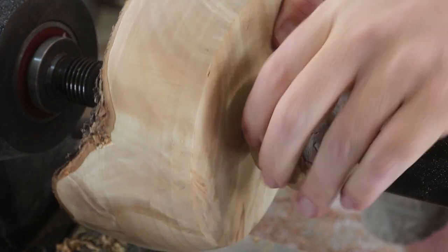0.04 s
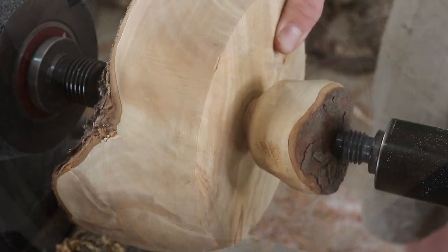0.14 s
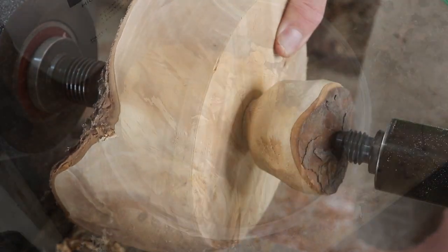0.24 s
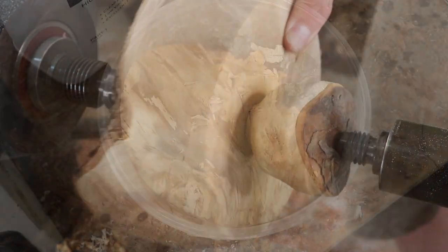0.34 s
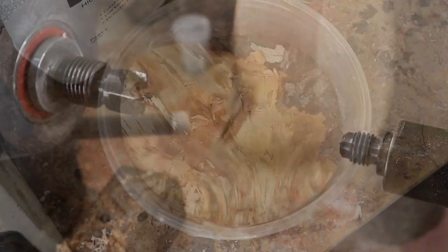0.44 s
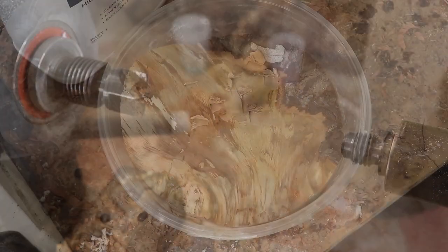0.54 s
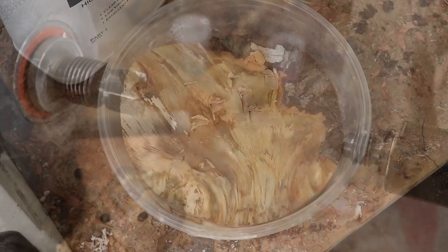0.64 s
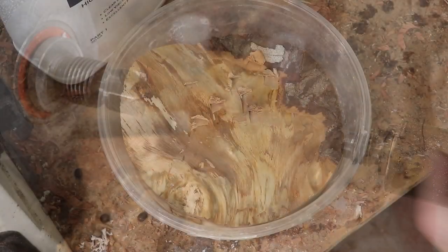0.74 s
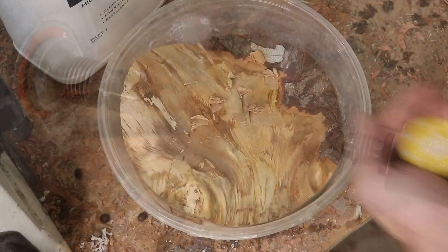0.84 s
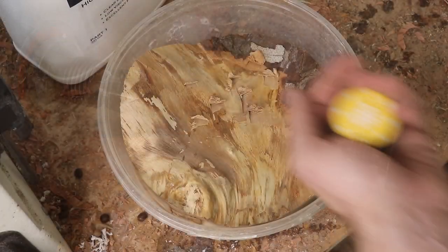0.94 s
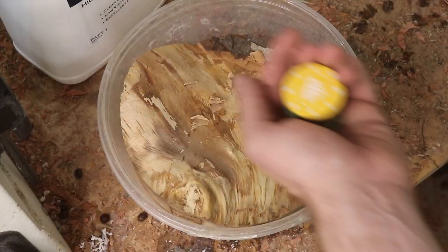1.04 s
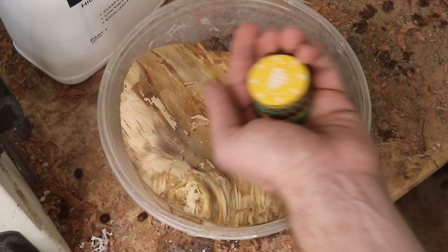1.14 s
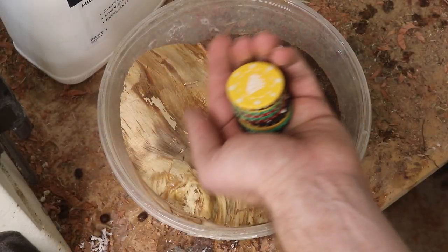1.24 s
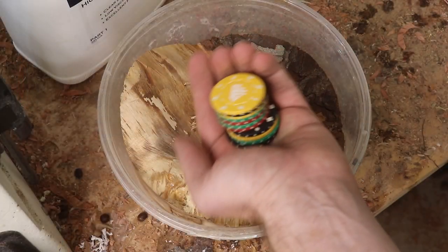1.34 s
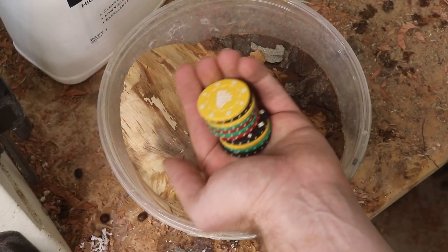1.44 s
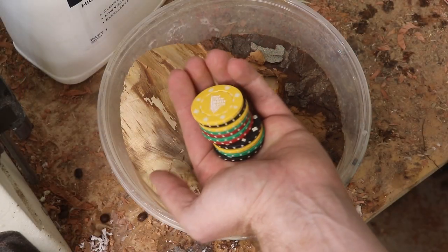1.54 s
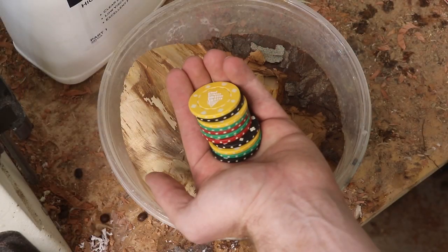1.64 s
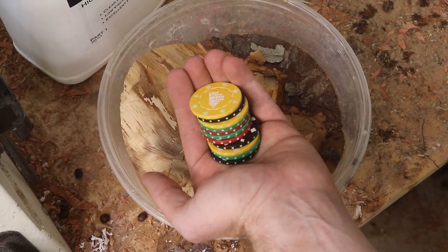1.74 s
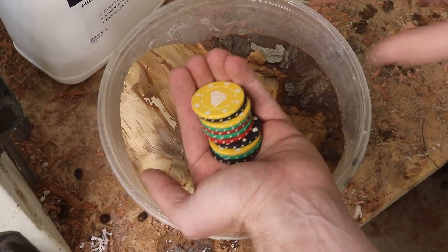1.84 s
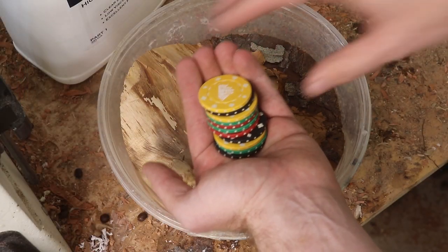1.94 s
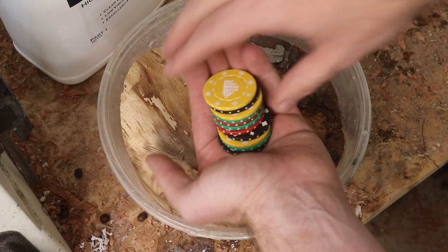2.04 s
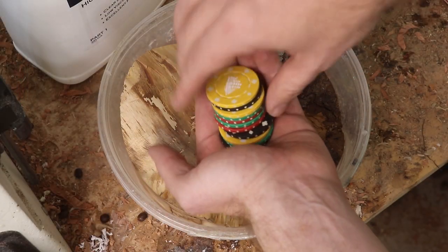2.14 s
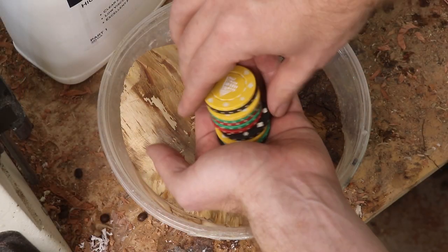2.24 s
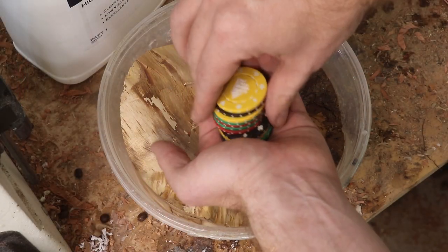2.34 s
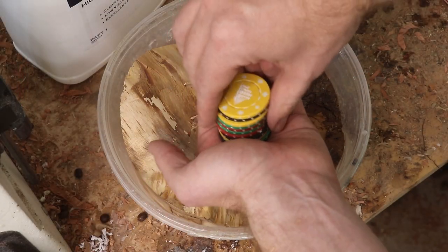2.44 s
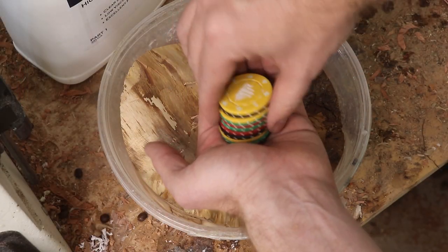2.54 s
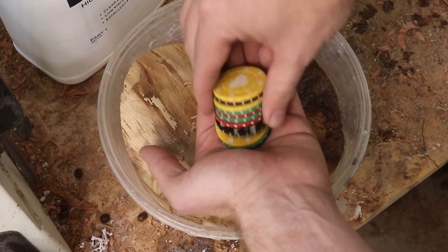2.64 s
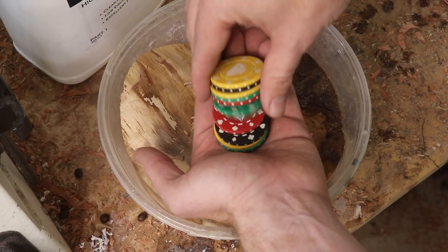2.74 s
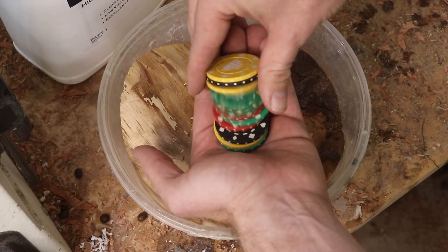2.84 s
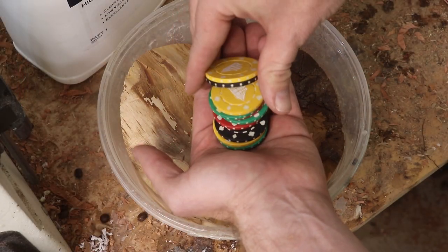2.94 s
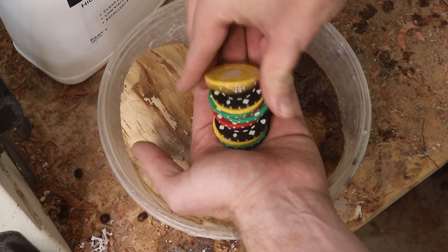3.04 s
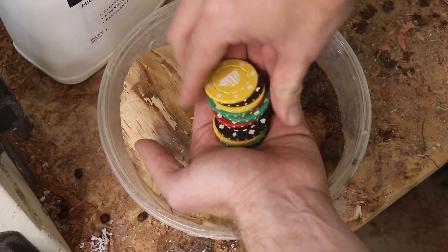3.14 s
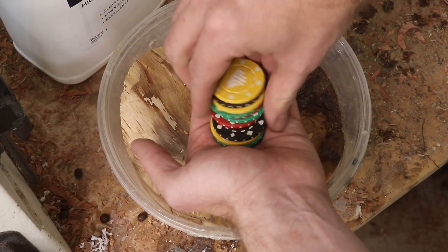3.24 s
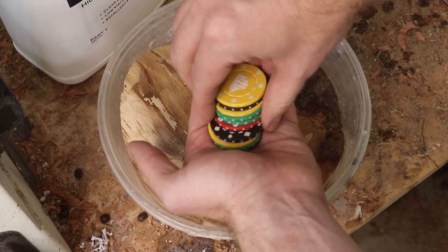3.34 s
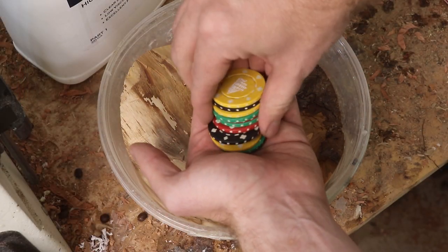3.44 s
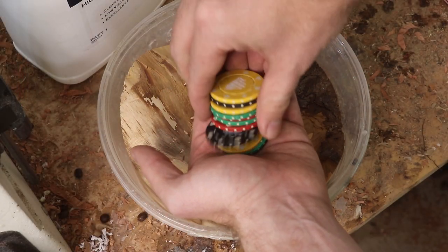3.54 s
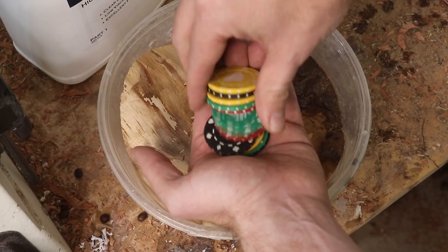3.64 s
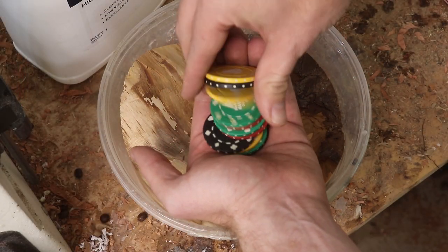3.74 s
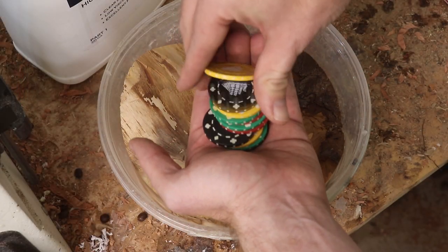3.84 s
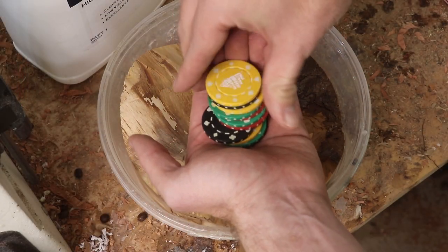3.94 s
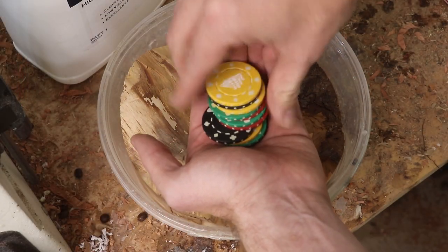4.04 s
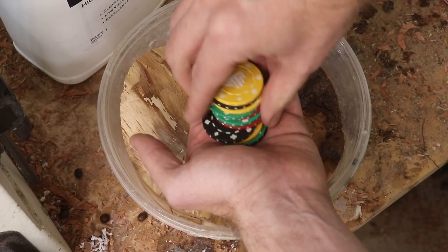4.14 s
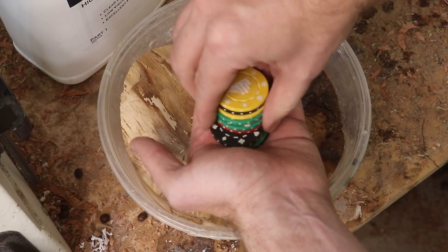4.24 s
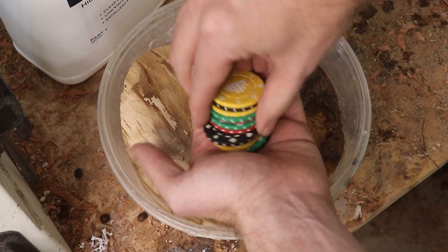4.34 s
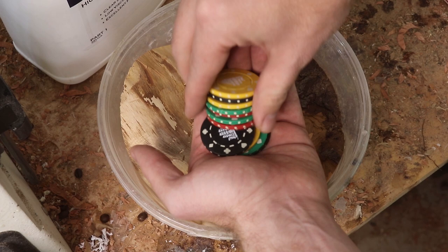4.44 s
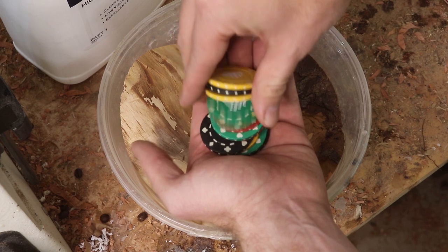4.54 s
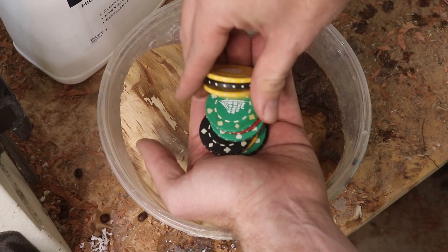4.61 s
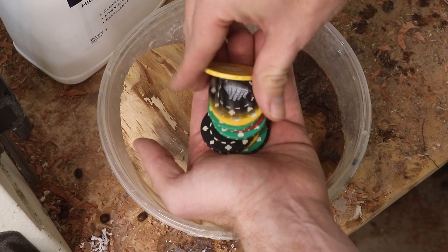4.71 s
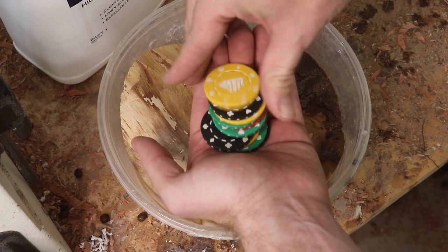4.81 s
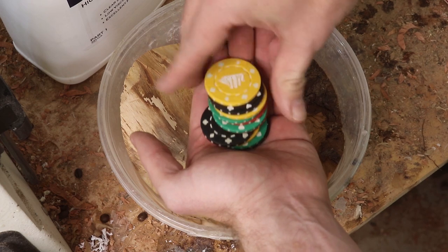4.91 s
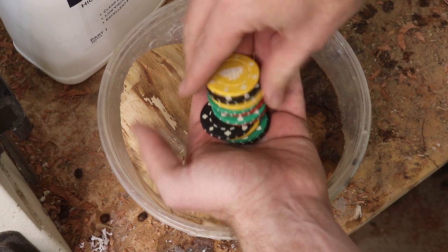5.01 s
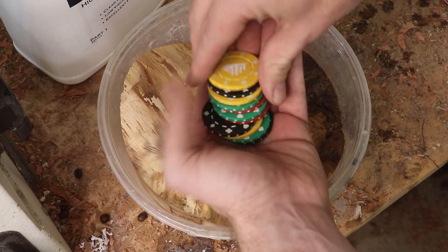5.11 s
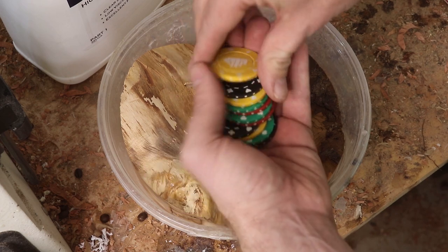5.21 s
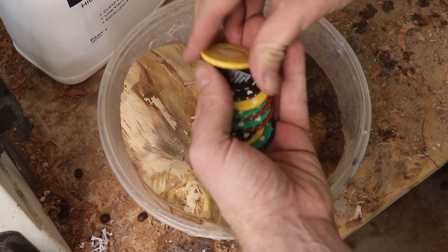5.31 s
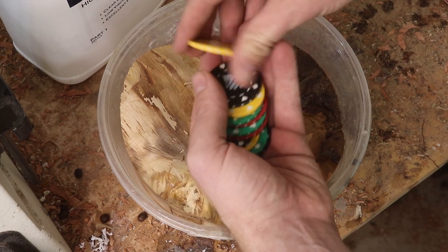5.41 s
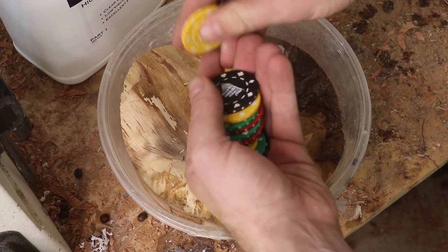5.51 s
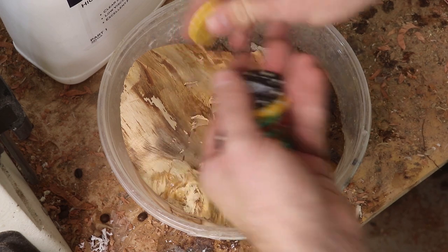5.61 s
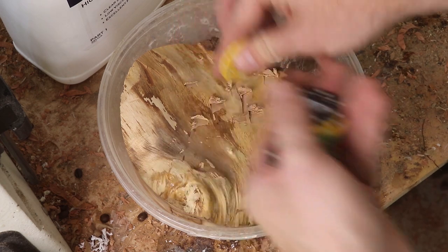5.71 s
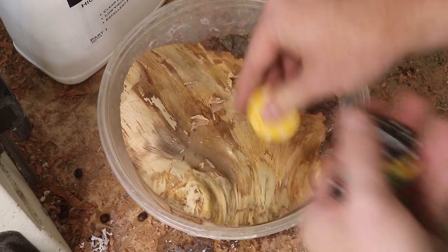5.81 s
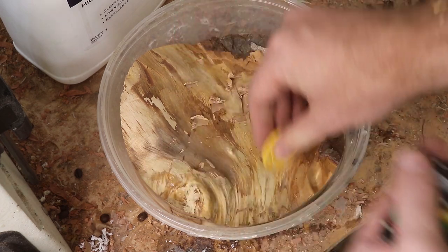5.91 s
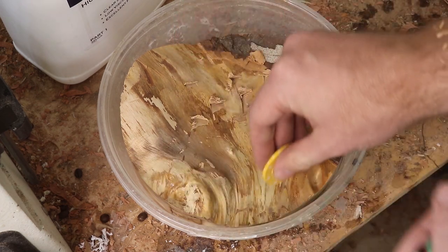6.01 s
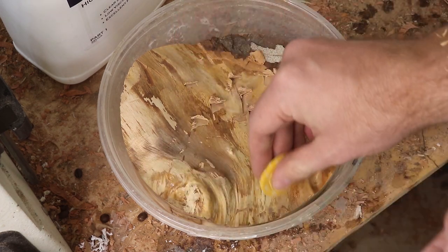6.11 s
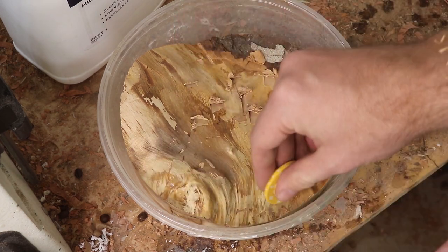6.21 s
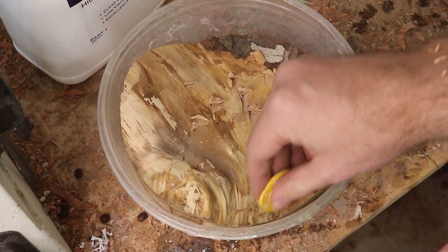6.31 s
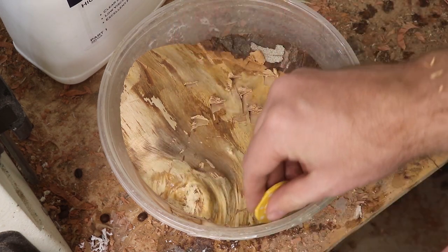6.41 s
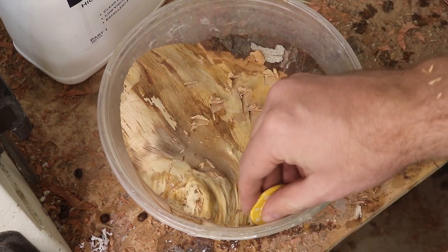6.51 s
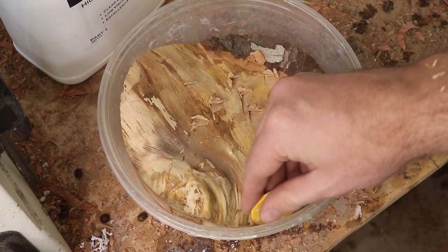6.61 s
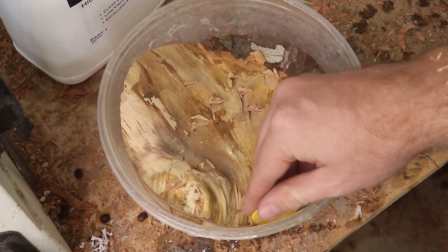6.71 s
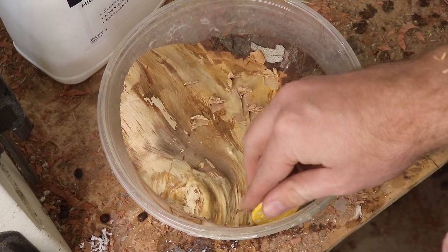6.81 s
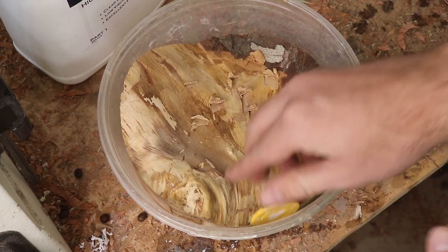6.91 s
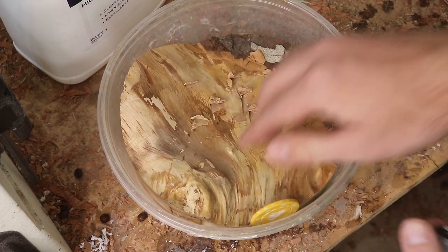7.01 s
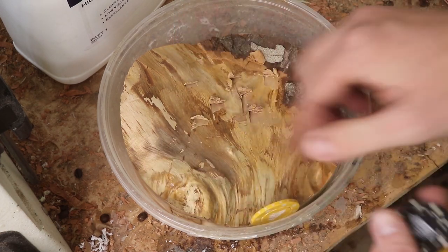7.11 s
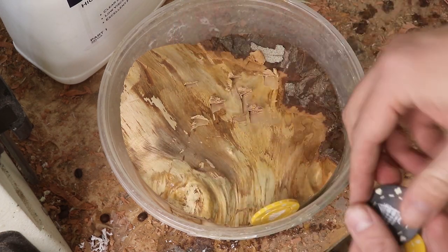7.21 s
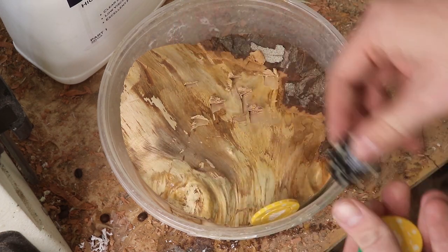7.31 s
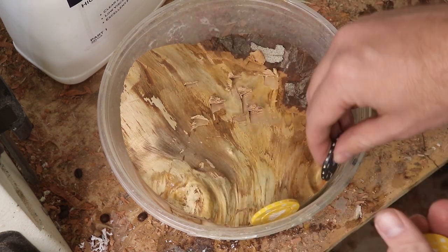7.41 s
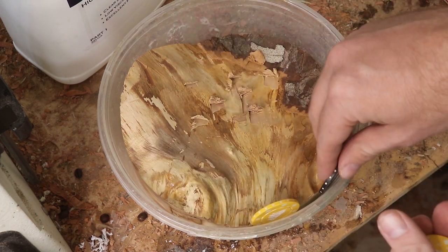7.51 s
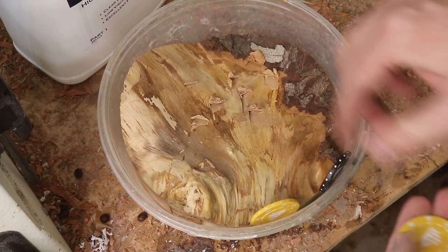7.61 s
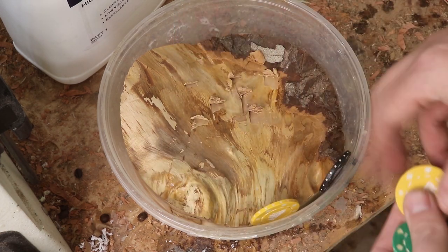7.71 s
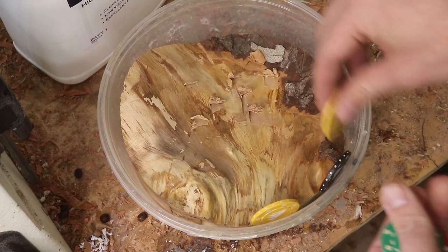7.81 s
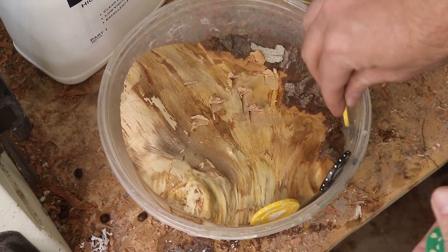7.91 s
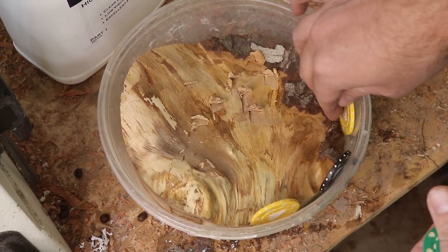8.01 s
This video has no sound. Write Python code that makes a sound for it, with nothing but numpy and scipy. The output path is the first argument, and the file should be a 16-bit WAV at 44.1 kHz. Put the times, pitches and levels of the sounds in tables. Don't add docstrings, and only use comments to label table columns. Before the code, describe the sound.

In a quiet workshop, a motor hum rises under a woody knock and scrape, then cuts off. A sharp chip clack follows, then near silence. Metal-cored poker chips are riffled three times in bright, dense clacks with ringing rattles. Later, single chips knock hollowly on a plastic tub, with light scuffs and a small squeak. Close stereo microphone, short room decay, low rumble and steady hiss.

```python
import sys
import numpy as np
from scipy import signal
from scipy.fft import rfft, irfft
from scipy.io import wavfile
from scipy.ndimage import uniform_filter1d

SR = 44100
rng = np.random.default_rng(int(sys.argv[2]) if len(sys.argv) > 2 else 0)


def amplitude_ratio(level_db):
    exponent = np.asarray(level_db, float) / 20
    return 10 ** exponent


def store_wav(level_fs):
    pcm = np.round(np.clip(np.atleast_2d(level_fs), -1, 1) * 32767)
    wavfile.write(sys.argv[1], SR, pcm.T.astype(np.int16))


N = 355446


def evened(x):
    return x / np.sqrt(np.mean(x ** 2) + 1e-20)


def wander(noise, width):
    return evened(uniform_filter1d(uniform_filter1d(noise, width), width))


def read(points, hz):
    f, value = np.transpose(points)
    return np.interp(np.log(hz + 1), np.log(f + 1), value)


def add(mix, s, sound):
    part = mix[:, max(round(s * SR), 0):][:, :sound.shape[1]]
    part += sound[:, :part.shape[1]]


def pair(noise, same):
    return np.array([noise[0], same * noise[0] + np.sqrt(1 - same ** 2) * noise[1]])


def coloured(x, gain):
    log_gain = np.log(np.concatenate([gain, gain[-2:0:-1]]) + 1e-5)
    response = np.exp(signal.hilbert(log_gain).conj())[:len(gain)]
    return irfft(rfft(x, 2 * len(gain) - 2) * response)[..., :x.shape[-1]]


def rings(t, hz, db, t60, phase):
    fade = amplitude_ratio(db[:, None] - 60 * t / np.clip(t60, .005, 1)[:, None])
    return (fade * np.sin(2 * np.pi * hz[:, None] * t + phase[..., None])).sum(axis=1)


# pitch_hz, likeness (0 to 1)
COHERENCE = [(25, 0.75), (60, 0.86), (180, 0.75), (550, 0.59), (1650, 0.033), (4970, 0), (15000, 0)]


def bed(spectrum, level_db, patchy_db):
    frames, hz = N // 256 + 5, np.fft.rfftfreq(1024, 1 / SR)
    a, b, c, d, patches = rng.standard_normal((frames, 513, 5)).T
    patches = uniform_filter1d(patches, 10, axis=0)
    patches = evened(uniform_filter1d(patches, 14, axis=1))
    z = pair([a + 1j * b, c + 1j * d], read(COHERENCE, hz)[:, None])
    z = z * amplitude_ratio(read(spectrum, hz)[:, None] + patchy_db * patches)
    noise = signal.istft(z, nperseg=1024, noverlap=768)[1][:, :N]
    return amplitude_ratio(level_db) * evened(noise)


# start_s, level_db
RUMBLE_LEVEL = [(0, -54.5), (.6, -56.5), (0.629, -60), (1.6, -62), (2.15, -62), (2.4, -59.5), (2.65, -61),
                (3.0, -65.5), (3.35, -59.5), (3.8, -70), (4.1, -61), (4.55, -59), (4.7, -60.5),
                (5.4, -58.5), (6.6, -60.5), (7.4, -57.5), (7.55, -61.5), (8.06, -63.5)]
# pitch_hz, density_db (per Hz)
RUMBLE_SPECTRUM = [(20, -35), (48, -13), (65, 6.5), (90, -6), (135, -10), (200, -6.5), (300, -45.5)]
# pitch_hz, density_db (per Hz)
AIR_SPECTRUM = [(150, -30), (250, -4), (320, -1.5), (480, -5), (610, 0.5), (800, -3), (1100, -5.5),
                (2000, -44.5)]


def ground():
    rumble_db = np.interp(np.arange(N) / SR, *np.transpose(RUMBLE_LEVEL))
    return bed(RUMBLE_SPECTRUM, rumble_db, patchy_db=1.5) + bed(AIR_SPECTRUM, -62, patchy_db=.9)


# pitch_hz, density_db (per Hz)
HISS_SPECTRUM = [(700, -17.5), (1300, 6.5), (2500, -2.5), (6200, -7), (10000, -14), (14800, -28),
                 (15600, -26), (16200, -50)]


def hiss():
    return bed(HISS_SPECTRUM, -64.5, patchy_db=1.8)


def ducking_db(near):
    power_db = 10 * np.log10(abs(uniform_filter1d((near ** 2).mean(0), 8000, origin=3600)) + 1e-12)
    climb = np.arange(N) * 110.0 / SR
    held_db = np.maximum.accumulate(power_db + climb) - climb
    over_db = np.maximum(held_db + 34.0, 0)
    return -1.2 * uniform_filter1d(over_db, 1500)


# start_s, pitch_hz (lower hum), level_db
MOTOR_RUN = [
    (0, 86.2, -58),
    (.15, 86, -48.5),
    (0.299, 99.5, -52.5),
    (0.45, 109, -51.5),
    (.59, 115, -45),
    (0.618, 119.5, -63),
]


def motor():
    s, hz, db = np.transpose(MOTOR_RUN)
    t = np.arange(N) / SR
    speed_hz = np.interp(t, s, hz) * (1 + 0.037 * np.sin(2 * np.pi * 6.0 * t))
    turn = 2 * np.pi * np.cumsum(speed_hz) / SR
    waver = [wander(n, 700) for n in rng.standard_normal((2, N))]
    lower = (1 + .5 * waver[0]) * np.sin(turn)
    upper = (1 + .5 * waver[1]) * np.sin(1.6 * turn)
    hum = amplitude_ratio(np.interp(t, s, db, right=-120)) * (lower + upper)
    return np.array([hum, np.roll(hum, -60)])


# pitch_hz, t60_s
ROOM_DECAY = [(300, .2), (1500, .3), (4000, .42), (7500, .42), (12000, .3), (16000, .24)]
SHADE_HZ, SHADE_WIDTH_HZ, SHADE = 6300, 810, .22
ROOM_EDGE_HZ = 17300


def room(x):
    taps = np.zeros((2, SR // 2))
    slots = np.arange(120, SR // 2 - 20, 20)
    at = slots + rng.integers(0, 20, (2, len(slots)))
    np.put_along_axis(taps, at, rng.choice([-1., 1.], at.shape), 1)
    hz, t, z = signal.stft(taps, SR, nperseg=256)
    hz = hz[:, None]
    z = z * (1 - SHADE / (1 + ((hz - SHADE_HZ) / SHADE_WIDTH_HZ) ** 2))
    z = z / (1 + (hz / ROOM_EDGE_HZ) ** 40)
    tail = signal.istft(z * amplitude_ratio(-60 * t / read(ROOM_DECAY, hz)), SR, nperseg=256)[1]
    return signal.fftconvolve(x, tail / np.linalg.norm(tail[0]), axes=1)[:, :N]


# start_s, level_db, length_s, pitch_hz
SQUEAK_EVENTS = [
    (7.991, -44.5, 0.041, 1278),
    (8.006, -36.5, 0.035, 899),
    (8.04, -37, 0.022, 920),
]


def squeaks():
    out = np.zeros((2, N))
    for s, db, length, hz in SQUEAK_EVENTS:
        u = np.arange(0, length, 1 / SR) / length
        waver = wander(rng.standard_normal(len(u)), 150)
        turn = 2 * np.pi * np.cumsum(hz * (1.01 - 0.018 * u + 0.0093 * waver)) / SR
        swell = np.sin(np.pi * u ** 0.79) * (1 + 0.36 * waver)
        add(out, s, amplitude_ratio(db) * swell * np.sin(turn + np.array([[.6], [-.6]])))
    return out


# start_s, level_db (rms), length_s,
# pitch_hz
BODY_STRANDS = [(0.297, -61, 0.21, 266), (0.342, -55, .012, 2700), (0.467, -48, 0.057, 2290),
                (.472, -47, .03, 1230), (.541, -40, .014, 1110), (0.548, -35, 0.066, 1725),
                (0.543, -43, 0.05, 707), (.55, -38, 0.047, 1120), (0.571, -38.5, 0.031, 315),
                (0.543, -48.5, 0.039, 397), (0.643, -49, .012, 5100), (0.403, -58, .09, 281),
                (0.518, -51.5, 0.11, 266), (.543, -48, .011, 4900), (.55, -43, .045, 2200),
                (0.8605, -27, 0.0048, 13100), (.8595, -39, 0.0031, 790), (.86, -44, .008, 3200),
                (.86, -50, .008, 1900),
                (2.273, -74, .09, 13200), (2.358, -50, 0.027, 7440), (5.878, -71.5, .09, 13300),
               (6.07, -70, .09, 13100), (2.95, -37, .065, 6300), (2.96, -43, .06, 3920),
               (3.745, -36, .045, 6400), (3.885, -40, .03, 6350), (4.295, -62.5, 0.043, 2490),
               (4.295, -63, .04, 6400), (4.783, -50, .01, 453), (3.122, -48, .01, 425),
               (6.046, -47, .015, 1500), (6.266, -43, .02, 960), (6.267, -45, .025, 2760),
               (6.266, -55, .012, 5000), (6.3, -59, .09, 620), (6.51, -53, .04, 732),
               (6.511, -53, .012, 3650), (6.646, -48, .014, 1620), (6.646, -54, .012, 3400),
               (6.69, -60, .05, 1410), (7.455, -53, .016, 1620), (7.228, -58.5, 0.07, 4400),
               (7.23, -60, .07, 1900), (7.347, -54.5, 0.034, 300), (7.388, -45.5, 0.028, 4700),
               (7.452, -61, 0.022, 683), (7.505, -49, .014, 1090), (7.545, -42.5, 0.027, 2680),
               (7.546, -44, .016, 3600), (7.547, -51.5, .03, 394), (7.497, -57, 0.035, 456),
               (7.582, -63, .02, 5460), (7.625, -59, .02, 2500), (7.775, -62, 0.018, 4400),
               (7.785, -55, .025, 1900), (7.798, -44, 0.015, 4540), (7.797, -50, .016, 3080),
               (7.946, -60, 0.056, 802), (7.982, -44, 0.01, 880), (7.984, -49, 0.018, 2770)]


def strands():
    rows = BODY_STRANDS
    out, noise = np.zeros((2, N)), rng.standard_normal((len(rows), 2, 4096))
    hz = np.fft.rfftfreq(4096, 1 / SR)
    for (s, db, length, mode_hz), n in zip(rows, noise):
        width_hz = np.clip(0.096 * mode_hz, 40, 450)
        resonance = 1 / (1 + (2 * (hz - mode_hz) / width_hz) ** 2)
        sung = evened(irfft(rfft(pair(n, 0.49)) * resonance))
        u = np.clip(np.arange(4096) / SR / length, 0, 1)
        add(out, s, amplitude_ratio(db) * sung * abs(np.sin(np.pi * u ** 0.49)) ** 0.69)
    return out


# start_s, level_db (rms), length_s, pitch_hz (surface), hiss_db (broad)
WOOD_SCRAPES = [
    (0.023, -73, 1, 3930, 5),
    (0.342, -48.5, 0.017, 2200, -9),
    (0.473, -47.5, 0.016, 1660, 16),
    (0.487, -53.5, 0.021, 2300, 20.5),
    (0.491, -61, 0.025, 4000, 13),
    (0.54, -20.5, 0.014, 1440, -22.5),
    (0.545, -32, 0.07, 1260, -46),
    (0.556, -36, 0.056, 579, -43),
    (0.575, -35, 0.013, 1920, -17),
    (0.643, -46, 0.0063, 4440, -10),
]
# start_s, level_db (rms), length_s, pitch_hz
CHIP_SCUFFS = [(2.624, -61.5, 0.05, 2800), (2.997, -42, 0.01, 3900), (3.296, -50, 0.078, 5200),
               (3.374, -51.5, 0.041, 2210), (4.294, -57, 0.037, 4110), (4.425, -54, 0.03, 3500),
               (5.245, -44.5, 0.018, 4520), (6.678, -62.5, 0.13, 1364), (7.209, -56.5, 0.14, 4950),
               (7.335, -56.5, 0.063, 1110), (7.382, -42, 0.03, 4960), (7.497, -57.5, 0.073, 1040),
               (7.541, -37.5, 0.029, 2620), (7.542, -39.5, 0.028, 910), (7.56, -49.5, 0.052, 1050),
               (7.73, -65, 0.032, 4300), (7.771, -57, 0.037, 4520), (7.79, -46.5, 0.031, 5160),
               (7.979, -40.5, 0.031, 1880), (8.044, -31, 0.074, 3070), (0.547, -58, 0.06, 3320),
               (6.692, -61, 0.042, 3000), (6.729, -61, 0.055, 2800)]
# start_s, level_db (rms), length_s
FINGER_RUBS = [(0, -51, 0.019), (1.726, -64.5, 0.034), (1.946, -68, 0.21), (2.29, -63.5, 0.25),
               (2.383, -58, 0.06), (2.545, -61, 0.046), (5.595, -59, 0.023), (5.636, -63.5, 0.068),
               (5.837, -67.5, 0.14), (6.076, -63.5, 0.13), (7.623, -64, 0.021), (7.862, -62.5, 0.033)]
SCRAPE_WIDTH, SCUFF_WIDTH, SCUFF_HISS_DB = 1, .5, -3
RUB_HZ, RUB_WIDTH_HZ, RUB_HISS_DB = 5200, 4000, 14.5


def scuffs():
    rows = [(s, db, length, f, SCRAPE_WIDTH * f, hiss_db) for s, db, length, f, hiss_db in WOOD_SCRAPES]
    rows += [(s, db, length, f, SCUFF_WIDTH * f, SCUFF_HISS_DB) for s, db, length, f in CHIP_SCUFFS]
    rows += [(s, db - RUB_HISS_DB, length, RUB_HZ, RUB_WIDTH_HZ, RUB_HISS_DB)
             for s, db, length in FINGER_RUBS]
    out, noise = np.zeros((2, N)), rng.standard_normal((len(rows), 3, 28000))
    hz = np.fft.rfftfreq(28000, 1 / SR)
    broad = hz / (hz + 900) / (1 + (hz / 7000) ** 2) / (1 + (hz / 15600) ** 30)
    for (s, db, length, centre_hz, width_hz, hiss_db), n in zip(rows, noise):
        clumps_db = 2.8 * evened(uniform_filter1d(n[2], 25))
        grit = rfft(pair(n, 0.019) * amplitude_ratio(clumps_db))
        surface = 1 / (1 + (2 * (hz - centre_hz) / width_hz) ** 4)
        drag = evened(irfft(grit * surface)) + amplitude_ratio(hiss_db) * evened(irfft(grit * broad))
        u = np.clip(np.arange(28000) / SR / length, 0, 1)
        add(out, s, amplitude_ratio(db) * drag * np.sin(np.pi * u ** 0.78) ** 2.07)
    return out


# start_s, level_db, pitch_hz (wall), upper_db (upper mode), tick_db
TUB_KNOCKS = [(0.074, -36, 846, -18, -12), (0.344, -41, 865, -15, -7), (.786, -35, 311, -1, -7),
              (2.302, -34.5, 1465, -26, -7), (3.523, -49, 2720, -8, 3), (4.386, -35, 1493, -32.5, -13.5),
              (4.434, -36.5, 2240, -7, -2.5), (5.33, -43.5, 570, -14, -23), (5.371, -35.5, 250, -2, -10.5),
              (6.046, -19.5, 1160, -15.5, -14.5), (6.136, -33, 1140, -19.5, -16),
              (6.2662, -18, 1194, 0.5, -8.5), (6.512, -37, 675, -5.5, 9), (6.647, -39.5, 838, -0.5, 7.5),
              (6.691, -42.5, 703, -2.5, 3), (6.713, -42, 1290, -5.5, 4), (6.823, -40, 629, -2, -15),
              (7.458, -46, 1590, -34, -9), (7.506, -32.5, 1114, -14, -8), (7.913, -42, 1510, -29, -23)]
HUM_ON_MODES_DB = np.array([-3, -10, 2, -20, -45, -6])
WALL_T60_S, HUM_ON_T60_S, HUM_ON_DB, HUM_ON_PER_DB = .04, .24, -21, .7
PORT_PHASE = 1


def tub():
    t, out = np.arange(6000) / SR, np.zeros((2, N))
    hz = np.fft.rfftfreq(12000, 1 / SR)
    dull = hz / (hz + 700) / (1 + (hz / 4000) ** 3)
    ratio = np.array([.995, 1.06, 2.05, 1.8, 3.36, .51])
    share = np.array([0.8, 0.52, 0.66, 0.38, 0.36, 0.34])
    noise = rng.standard_normal((len(TUB_KNOCKS), 2, 6000))
    luck = rng.standard_normal((len(TUB_KNOCKS), 2, 6))
    for (s, db, wall_hz, upper_db, tick_db), n, chance in zip(TUB_KNOCKS, noise, luck):
        mode_hz = wall_hz * ratio
        mode_db = np.array([-3, -9, upper_db, upper_db - 4.5, upper_db - 9.0, -14])
        phase = chance[0] + PORT_PHASE * np.array([[1], [-1]]) * np.tanh(chance[1])
        wall = rings(t, mode_hz, mode_db, WALL_T60_S * share, phase)
        hum_db = mode_db + HUM_ON_DB + HUM_ON_PER_DB * (db + 22.0) + HUM_ON_MODES_DB
        hum = rings(t, mode_hz * 1.003, hum_db, HUM_ON_T60_S * share, phase[::-1])
        wall = wall + (1 + .75 * wander(n, 160)) * hum
        crack = coloured(pair(n, 0.42) * amplitude_ratio(tick_db - 60 * t / 0.044), dull)
        add(out, s, amplitude_ratio(db) * (wall * (1 - np.exp(-t / 0.00053)) + crack))
    return out


# start_s, level_db (blow), pitch_hz (main
# ring), ring_db (over the blow), chatter_ms
LANDINGS = [(.8598, -15.5, 6420, -12, 3), (2.3559, -23.5, 6480, -15.5, .6),
            (2.7263, -19, 5850, -10, 4.9), (2.7779, -11, 6450, -18, 1.5),
            (2.7858, -14.5, 6200, -12, 1.2), (2.8308, -8, 6400, -13, 2.1),
            (2.8892, -8, 6374, -2.5, 1.4), (2.9002, -11, 6300, -13, 3), (3.0206, -16, 6300, -9.5, 4),
            (3.1203, -6, 6060, -16, .73), (3.1244, -4.5, 6470, -24, 2.9),
            (3.193, -10.5, 6330, -10, 2.8),
            (3.6598, -7.5, 6218, -7, 1), (3.6916, -7, 6190, -9, 2), (3.725, -13, 6340, -9, 1.5),
                   (3.841, -10, 6070, -10, 0.41), (3.9596, -8.5, 6620, -14.5, 2.5),
                   (4.037, -8, 6520, -15, 2.5),
            (4.4977, -14, 6160, -3.5, 1.9), (4.5694, -19, 6230, 1.5, 4),
                  (4.601, -7.5, 6300, -21.5, 2.5), (4.612, -5, 6350, -2.5, 6.3),
                  (4.6566, -18.5, 6300, -8.5, 2.7), (4.671, -20, 6400, -6.5, 2.5),
                  (4.7847, -8, 6120, -6, 2.5), (4.8313, -12, 6190, -5.5, 3.9), (4.9186, -7, 6440, -14, 2.7),
                  (4.9804, -12, 5930, -12, 1.7), (5.2472, -28, 6130, -11, 2.3)]
MORE_LANDINGS = [(2.7878, -10.5, 6040, -13, 3.5), (2.8327, -8, 6400, -9.5, 2.3), (2.8945, -20.5, 6350, -4.5, 2),
                 (2.974, -25, 6350, -5, 1.5), (2.9775, -22, 6300, -8, 1.7), (2.987, -20, 6350, -8, 1.5),
                 (3.002, -20.5, 6550, -5.5, 2), (3.0342, -27, 6250, -4.5, 1.5), (3.7467, -22, 6300, -8, 1.1),
                 (3.8836, -27, 6350, -8, 1.6), (3.9398, -27, 6400, -8, 1), (4.0464, -23, 6400, -8, 1.5),
                 (4.829, -23, 6250, -10.5, 1.4), (4.836, -25, 6300, -9, 1.5), (4.9837, -18.5, 6280, -8, 1.8)]
# start_s, level_db (blow), ring_db (over the blow)
SETTLING_RATTLES = [(.8277, -33.5, -8), (2.7342, -16, -20.5), (2.7416, -19, -17), (2.7509, -19, -26),
                    (2.798, -34, -21), (2.923, -42.5, -7.5), (2.929, -33, -7.5), (2.9334, -26, -14),
                    (2.9575, -26, -3), (2.9636, -20.5, -7), (2.9698, -21, -4), (2.9822, -22, -6.5),
                    (2.9913, -20, -5), (2.9951, -19.5, -5), (3.012, -26, -9.5), (3.0236, -15, -15),
                    (3.0555, -27, -12), (3.078, -35, -5), (3.1625, -25, 3.5), (3.229, -24, 15),
                    (3.2326, -41, 0), (3.25, -34, -4.5),
                    (3.7489, -14, -5), (3.7568, -15, -1), (3.7671, -19.5, 2), (3.7737, -15.5, 1),
                  (3.778, -15, 5), (3.7817, -19.5, -3), (3.823, -28, -12), (3.83, -27, -8),
                  (3.8519, -17.5, -17), (3.855, -29, 1), (3.881, -29, -4), (3.8917, -20, 2),
                  (3.8966, -21.5, 13), (3.9038, -17, -4), (3.909, -28, -8), (3.9359, -26.5, 2),
                  (3.9411, -28, 3.5), (3.947, -18, -14), (3.979, -43.5, -9.5), (3.993, -25.5, -12),
                  (4.0682, -32, -28), (4.217, -38, -32),
                    (4.5124, -28, -13), (4.5186, -32.5, -18), (4.524, -26.5, -13.5), (4.635, -21, -7),
                 (4.6774, -27, -20), (4.702, -36, -10.5), (4.7626, -25.5, -2.5), (4.776, -34.5, 6.5),
                 (4.7828, -14, -3), (4.8123, -33, 0.5), (4.8412, -28, 0.5), (4.861, -24.5, -7.5),
                 (4.865, -26.5, -10), (4.878, -31.5, -3), (5.133, -42, -9), (5.1497, -39, -17)]
RATTLE_HZ, RATTLE_SPREAD_HZ, RATTLE_MS = 6350, 98, 2.6


def contacts():
    rattles = SETTLING_RATTLES
    spread = rng.standard_normal((len(rattles), 2))
    settling = [(s, db, RATTLE_HZ + RATTLE_SPREAD_HZ * a, ring_db, RATTLE_MS * np.exp(0.46 * b))
                for (s, db, ring_db), (a, b) in zip(rattles, spread)]
    return LANDINGS + MORE_LANDINGS + settling


# pitch_hz, level_db (under the main ring), t60_share
DISC_MODES = [(3930, -11.5, 1.0), (4100, -19, 0.8), (6060, -14, 0.22), (6400, -23.5, .6), (8930, -18.5, 1),
              (12860, -17, 0.4), (15100, -23.5, .3)]
# pitch_hz, level_db
CONTACT_COLOUR = [(200, -35.5), (700, -31), (1500, -13.5), (2800, -2.5), (4000, -4.5), (5600, 3.5),
                  (6500, -2), (7600, -11), (9000, -3.5), (11500, -15.5), (13000, -11.5), (15400, -22),
                  (16100, -45)]
DISC_HZ, DISC_SPREAD = 6300, 0.004
GRIPPED, GRIP_S = 0.73, 0.004
SNAP, SNAP_S = 0.48, 0.00034
FIRST_TOUCH = 4.4


def clack(db, main_hz, ring_db, bright_db, chatter_s, noise, luck):
    t = np.arange(noise.shape[1]) / SR
    hz = np.fft.rfftfreq(2 * noise.shape[1], 1 / SR)
    chatter_s = np.clip(chatter_s, .0005, .008)
    meet = (np.exp(-t / chatter_s) + SNAP * np.exp(-t / SNAP_S)) * (1 - np.exp(-t / .0001))
    touch = FIRST_TOUCH * min(amplitude_ratio(db + 13.5), 1) * (np.arange(len(t)) == 2)
    tilt_db = bright_db * np.log2((hz + 1500) / 7800)
    pressed = 1 + 1.5 / (1 + ((hz - main_hz) / 400) ** 2)
    palm = amplitude_ratio(-34.5 + 1.01 * (db + 16.5)) / (1 + (hz / 1200) ** 2)
    colour = amplitude_ratio(read(CONTACT_COLOUR, hz) + tilt_db) * pressed + palm
    crack = coloured(pair(noise, 0.35) * meet + touch, colour)

    main_mode = (main_hz, 0, 1 if main_hz > 6050 else .4)
    mode_hz, mode_db, share = np.transpose([main_mode] + DISC_MODES)
    other = np.arange(len(mode_hz)) > 0
    mode_db = mode_db + (3.8 * luck[1] + bright_db * np.log2(mode_hz / main_hz)) * other
    size = np.clip(main_hz, 6150, 6520) / DISC_HZ
    mode_hz = mode_hz * np.where(other, size * (1 + DISC_SPREAD * luck[0]), 1)
    t60 = np.clip(.055 - 0.00051 * ring_db, .035, .12)
    phase = 3 * luck[2] + np.array([[1], [-1]]) * (0.45 + 0.21 * np.tanh(luck[3]))
    ring = rings(t, mode_hz, mode_db, t60 * share, phase)
    ring = ring * (1 + .22 * wander(noise[1], 60))
    grip = (GRIPPED + (1 - GRIPPED) * np.exp(-t / GRIP_S)) * (1 - np.exp(-t / 0.00013))
    sound = crack / abs(crack).max() + amplitude_ratio(min(ring_db, 0)) * ring * grip
    return amplitude_ratio(db + 2.0) * sound / abs(sound).max()


# start_s, brightness_db (per octave)
MEETING_ANGLE = [(.83, -3), (.86, 4.5), (2.36, -1.5), (2.73, 2), (2.78, 4), (2.9, 5), (2.96, 4.5), (3.2, 4),
                 (3.66, -2), (3.76, 7), (3.85, 4), (3.96, 7.5), (4.04, 2), (4.5, -6), (4.63, 7), (4.77, 1),
                 (4.98, 5.5), (5.25, -4.5)]
BRIGHT_PER_DB = 0.25


def chips(rows):
    out = np.zeros((2, N))
    noise = rng.standard_normal((len(rows), 2, 4096))
    luck = rng.standard_normal((len(rows), 4, len(DISC_MODES) + 1))
    for (s, db, hz, ring_db, ms), n, chance in zip(rows, noise, luck):
        bright_db = np.interp(s, *np.transpose(MEETING_ANGLE)) + BRIGHT_PER_DB * (db + 3.5)
        add(out, s, clack(db, hz, ring_db, bright_db, ms / 1000, n, chance))
    return out


def scene():
    right_db, room_db = 2.5, -13.5
    side = amplitude_ratio(np.array([[-.5], [.5]]) * right_db)
    hits = chips(contacts()) * side + tub()
    rubs = scuffs() + strands()
    near = hits + rubs + amplitude_ratio(room_db) * room(hits + 0.44 * rubs) + squeaks()
    background = amplitude_ratio(ducking_db(hits)) * ground() + motor()
    return near + background + hiss()


# start_s, end_s, level_db
LEVEL_SAGS = [
    (0.611, 0.642, -6),
    (7.32, 7.331, -15),
]
# start_s, level_db
SHORT_POPS = [
    (7.3162, -40),
    (7.3578, -33),
]


def sags_and_pops(x):
    t, sag_db, pops = np.arange(N) / SR, np.zeros(N), np.zeros((2, N))
    for start, end, db in LEVEL_SAGS:
        sag_db = sag_db + db * ((t > start) & (t < end))
    for s, db in SHORT_POPS:
        add(pops, s, amplitude_ratio(db) * np.hanning(5) * np.ones((2, 1)))
    return x * amplitude_ratio(uniform_filter1d(sag_db, size=60)) + pops


def low_pass(x):
    return signal.sosfilt(signal.butter(12, 16980, fs=SR, output="sos"), x)


def record(dry):
    ceiling, edge_hz = .45, 16600
    limited = ceiling * np.tanh(sags_and_pops(dry) / ceiling)
    taps = signal.firwin(255, edge_hz, window=("kaiser", 8), fs=SR)
    return low_pass(signal.oaconvolve(limited, taps[None], "same"))


dry = scene()
out = record(dry)
store_wav(out)
```